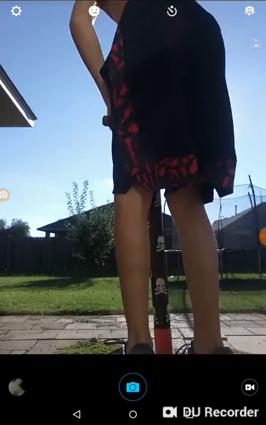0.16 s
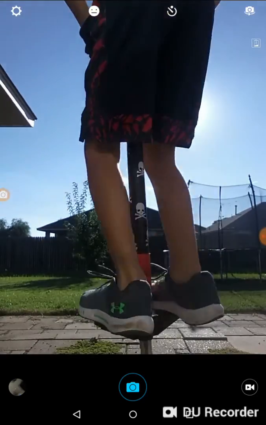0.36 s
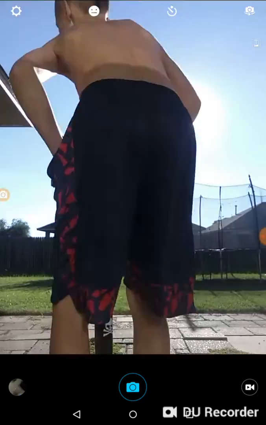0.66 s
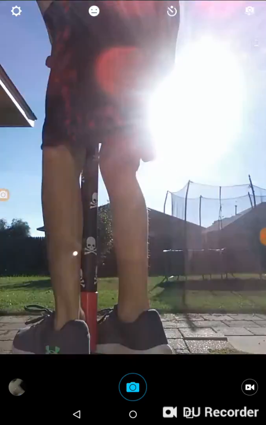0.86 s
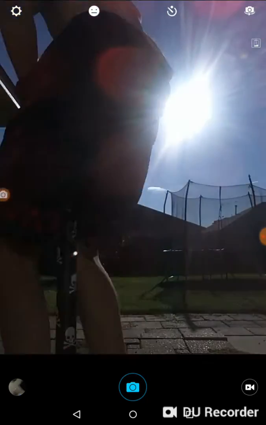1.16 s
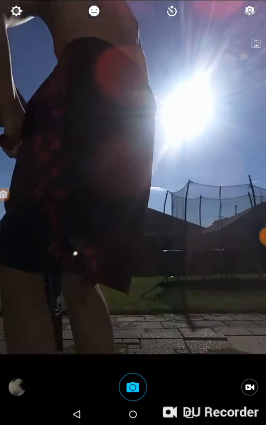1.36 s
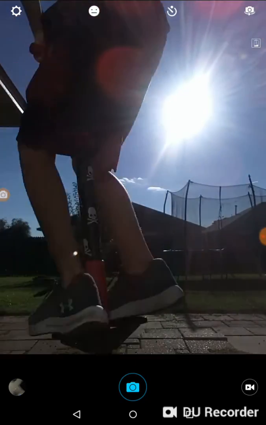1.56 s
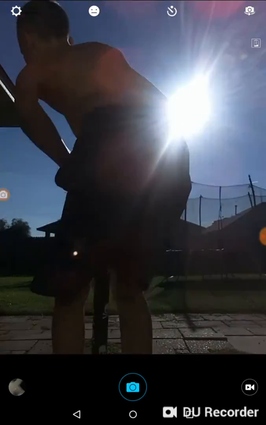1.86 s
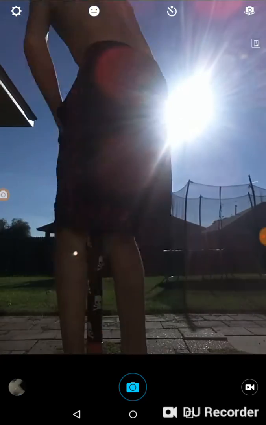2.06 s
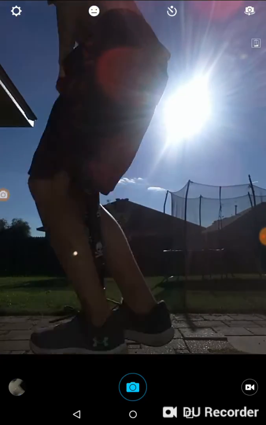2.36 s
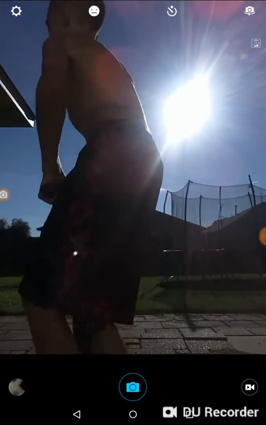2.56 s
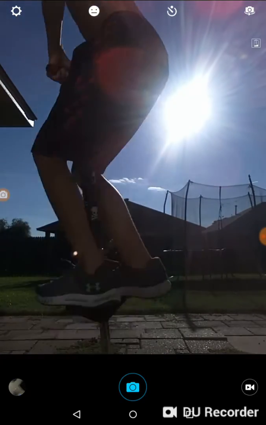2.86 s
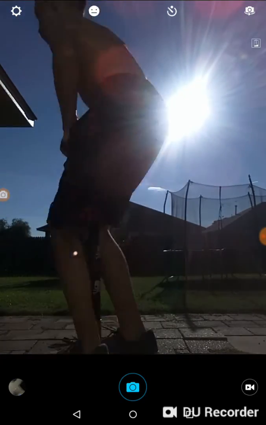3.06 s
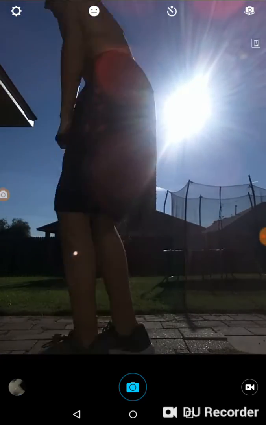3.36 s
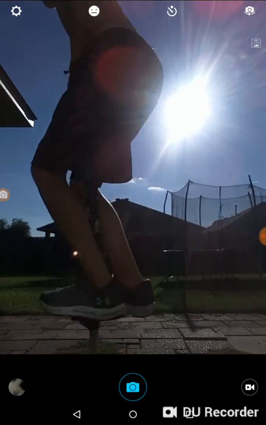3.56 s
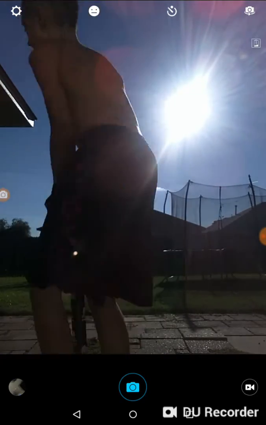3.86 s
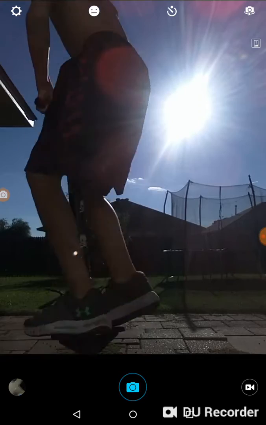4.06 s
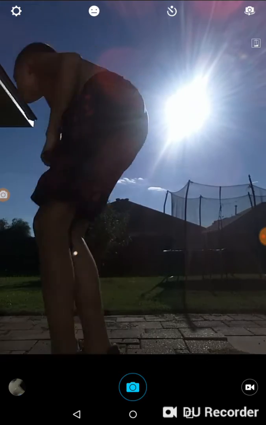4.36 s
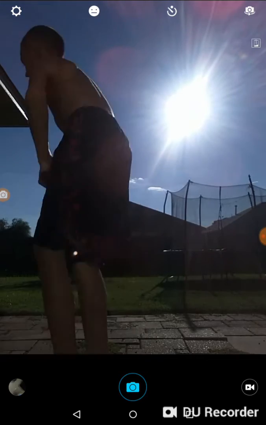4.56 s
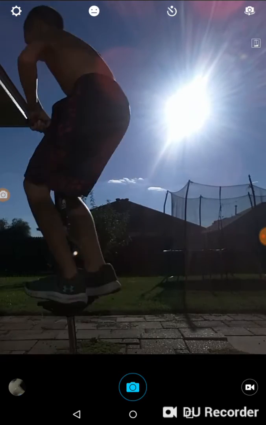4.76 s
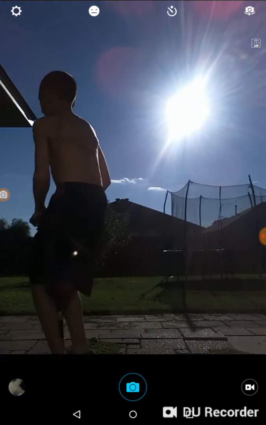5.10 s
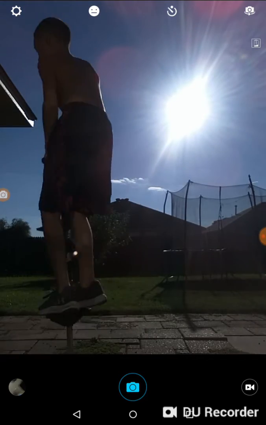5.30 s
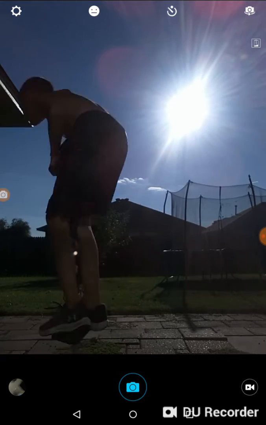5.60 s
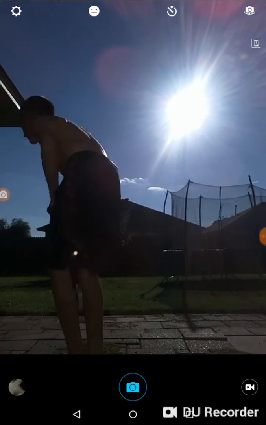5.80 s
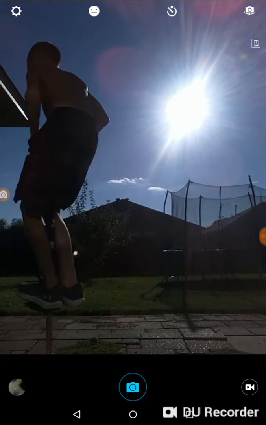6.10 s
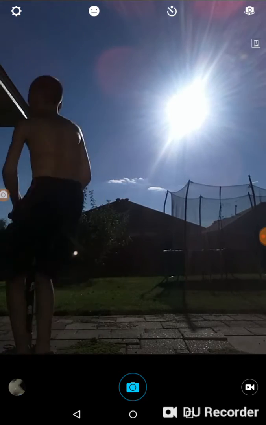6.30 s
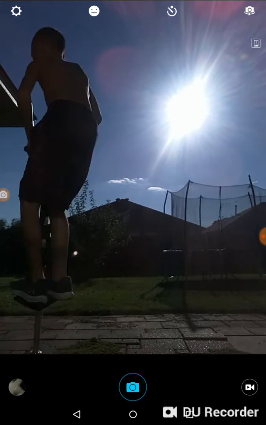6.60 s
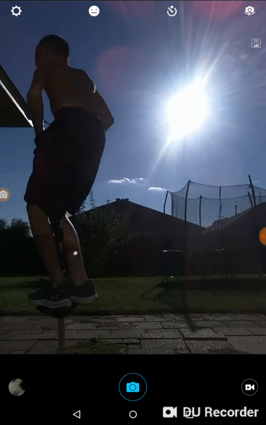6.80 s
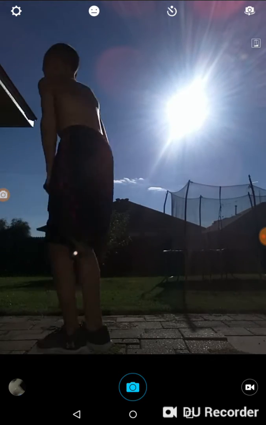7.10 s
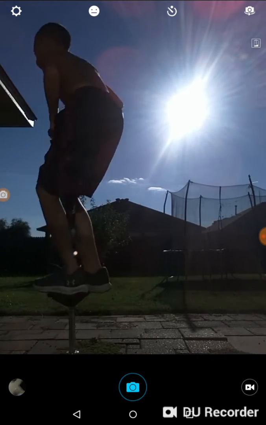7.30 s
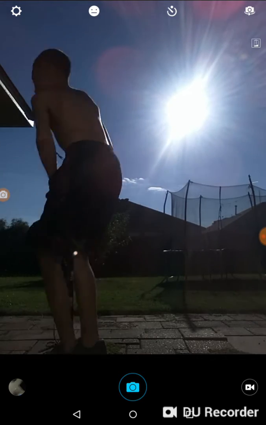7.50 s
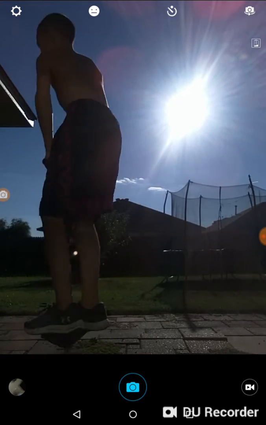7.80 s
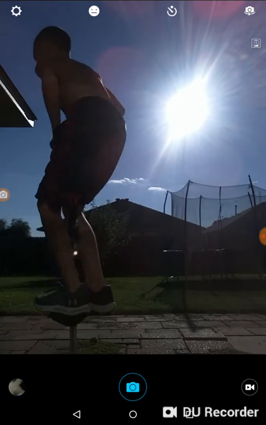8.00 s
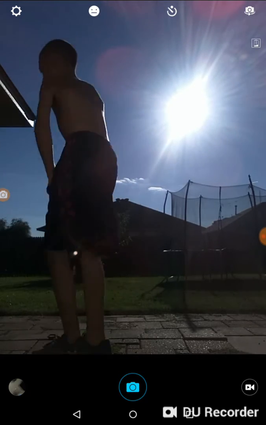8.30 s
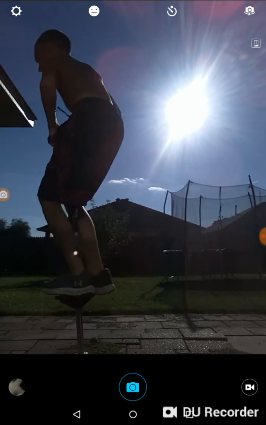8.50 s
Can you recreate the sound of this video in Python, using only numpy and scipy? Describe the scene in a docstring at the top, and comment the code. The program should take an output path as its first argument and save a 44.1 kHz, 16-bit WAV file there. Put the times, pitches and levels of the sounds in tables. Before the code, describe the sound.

A steel pogo stick bounces close by on a paved patio for about 8.5 seconds. It starts mid-bounce with a faint spring knock at 0 s and a loud, bright metal clack at 0.15 s. The first landing comes at 0.5 s: a short low thud, steel clash and rattling coils, followed within a tenth of a second by a hollow knock, then a faint scraping slide and another sharp clack at 0.8 s. This cycle repeats roughly every 0.64 s, with landings near 1.2, 1.8, 2.5, 3.1 and onward to 8.1 s, and a last clack near 8.36 s. Knocks vary from dull bumps to harder clanks, stronger around 1.9, 3.2 and 5.1 s; later landings clash slightly less. Tiny loose-metal ticks appear between blows, notably near 5.4 s. Short, bright reflections and a thin fence echo trail each blow above faint outdoor air and wavering low hum.

```python
"""A child bounces on a steel pogo stick on a garden patio, over a faint outdoor hum made of filtered noise.
First the loaded spring knocks in its tube; then the shaft slides out and clacks against its stop.
Loose parts tick, mostly in mid-air, and each landing thuds and sets the coils rattling before the next knock.
Thuds are fading sine waves; the steel is short clicks sent through fading noise and resonances.
House and fence throw the sound back as a fading tail and one thin echo."""
import sys
import numpy as np
from scipy import signal
from scipy.fft import rfft, irfft
from scipy.io import wavfile

SR = 44100
rng = np.random.default_rng(int(sys.argv[2]) if len(sys.argv) > 2 else 0)


def persist_wave(psi):
    """Save psi, clipped to +-1, as 16-bit WAV."""
    counts = np.round(np.clip(psi, -1, 1) * 32767).astype(np.int16)
    wavfile.write(sys.argv[1], SR, np.atleast_2d(counts).T)


N = 381465  # length of the sound, in samples

# the rubber foot meets the paving: start_s, thud_db, clash_db
LANDING_BLOWS = [(0.5244, -20, -14.5), (1.166, -23.5, -15.5), (1.81, -22, -15.5), (2.4568, -21, -14),
                 (3.0993, -28.5, -15.5), (3.7258, -19.5, -16), (4.3793, -21.5, -14), (4.995, -21.5, -19.5),
                 (5.6466, -19, -17.5), (6.248, -23, -17), (6.8764, -22, -17.5), (7.4921, -18.5, -19.5),
                 (8.095, -19, -20)]
# the compressed spring knocks in the tube: start_s, thud_db, clash_db
SPRING_KNOCKS = [(0, -33.5, -36.5), (0.6099, -21, -28.5), (1.2629, -26.5, -35), (1.9081, -25.5, -19.5),
                 (2.544, -29, -42.5), (3.1803, -24, -20), (3.82, -33.5, -54.5), (4.4612, -25.5, -34),
                 (5.072, -25, -19.5), (5.7304, -25.5, -32), (6.344, -25, -27.5), (6.9654, -23.5, -22),
                 (7.579, -28, -40.5), (8.184, -21.5, -21.5)]
# the shaft slides out and hits its stop: stop_s, clash_db, slide_db
STOP_BLOWS = [(0.148, -12, -40.5), (0.794, -12.5, -37), (1.447, -13, -40), (2.092, -13.5, -45),
              (2.727, -13, -40), (3.3625, -14, -41), (3.999, -13.5, -42.5), (4.6296, -12.5, -42.5),
              (5.2611, -15, -41), (5.911, -13.5, -48), (6.515, -13.5, -46.5), (7.143, -14.5, -40.5),
              (7.751, -13.9, -43), (8.355, -15, -46.5)]
# crowded resonances of tube and spring: pitch_hz, width_hz, level_db
STEEL_RESONANCES = [(780, 130, -0.5), (1286, 81, 6), (1514, 180, 3), (2215, 180, 1), (3620, 1400, -10),
                    (4240, 270, -5.5), (5797, 300, 2), (6484, 110, 3), (7606, 760, 4), (8880, 250, 0)]
# colour of the contacts with the foot on the ground: pitch_hz, level_db_per_hz
LOADED_COLOUR = [(60, -18), (200, 17), (450, 6.5), (750, -7.5), (1000, -1), (2000, 1.5), (2800, -1),
                 (4000, 3.5), (5100, -4), (8000, -8.5), (10000, -6.5), (13000, -18), (16000, -19.5)]
# colour of the contacts with the foot off the ground: pitch_hz, level_db_per_hz
FREE_COLOUR = [(60, -41.5), (200, -21), (400, -4.5), (650, -0.5), (1000, -2), (2000, 1.5), (2800, -2),
               (4000, 5.5), (5100, -0.5), (8000, -2.5), (10000, 3), (13000, -8), (16000, -10.5)]

BLOW_S = .02  # a blow's level is its energy spread over this time
TIME = np.arange(int(.6 * SR)) / SR  # seconds since a blow


def from_db(db):
    """Turn decibels into a factor for the wave's height."""
    return 10 ** (np.asarray(db) / 20)


def unit(x):
    """Scale to energy 1."""
    return x / np.sqrt(np.sum(x ** 2) + 1e-20)


def at_hz(points, hz):
    """Read a table between its points, with pitch on a logarithmic axis as in hearing."""
    table_hz, values = np.array(points).T
    return np.interp(np.log(np.maximum(hz, 1)), np.log(table_hz), values)


def butter(order, hz, kind="low"):
    """Design a smooth filter that passes one range of pitches."""
    return signal.butter(order, hz, kind, fs=SR, output="sos")


def add(track, s, level_db, sound):
    """Lay a blow into the track."""
    at = max(round(s * SR), 0)
    part = sound[:max(N - at, 0)]
    track[at:at + len(part)] += from_db(level_db) * np.sqrt(BLOW_S * SR) * part


def through(x, response):
    """Let every sample of x set off the response, and add up the results."""
    return signal.fftconvolve(x, response)[:len(x)]


def resonate(x, hz, width_hz):
    """Let one resonance answer x; a narrow one rings longer."""
    return signal.lfilter(*signal.iirpeak(hz, hz / width_hz, fs=SR), x)


def colour(x, spectrum, size=4096):
    """Filter to the given spectrum without sounding early (minimum phase); white noise keeps its power."""
    log_height = np.log(from_db(at_hz(spectrum, np.fft.rfftfreq(size, 1 / SR))))
    cepstrum = irfft(log_height)
    # folding the cepstrum onto positive times puts the response's energy at its start
    folded = np.r_[0, 2 * cepstrum[1:size // 2]]
    response = irfft(np.exp(rfft(folded, size)))
    return through(x, unit(response))


def brighten(x, times, bright_db, pivot_hz=3300):
    """Each blow tips the balance of bass and treble by its own amount until the next one comes."""
    # the tip changes 3 ms ahead of the blow
    latest = np.maximum(np.searchsorted(times, np.arange(N) / SR + .003) - 1, 0)
    tip = from_db(bright_db)[latest]
    low = signal.sosfilt(butter(1, pivot_hz), x + 1e-18)
    return (low / tip + (x - low) * tip) / np.sqrt((tip ** 2 + tip ** -2) / 2)


def modes(table, scatter_db, detune):
    """Decaying sines; each blow shares its energy among them a little differently."""
    hz, db, t60 = np.array(table).T[:, :, None]
    strength, pitch, side = rng.standard_normal((3, len(table), 1))
    sines = np.sign(side) * np.sin(2 * np.pi * hz * (1 + detune * pitch) * TIME)
    fading = from_db(db + scatter_db * strength - 60 * TIME / t60)
    return unit(np.sum(fading * sines, axis=0))


def chatter(envelope, per_s, spread_db=-0.5):
    """Uneven metal-on-metal contacts at chance moments, under an envelope."""
    touch = rng.random(len(TIME)) < per_s / SR
    signs = rng.choice([-1, 1], len(TIME))
    sizes = signs * from_db(spread_db * rng.standard_normal(len(TIME)))
    return unit(touch * sizes * envelope)


def bands(t60s, count=18):
    """Band filters, each with its own noise and decay time."""
    edges = np.geomspace(50, 18000, count + 1)  # Hz
    white = rng.standard_normal((2, N))
    for k, (low, high) in enumerate(zip(edges, edges[1:])):
        band = butter(2, [low, high], "band")
        noise = signal.sosfilt(band, white[k % 2])
        yield band, noise, at_hz(t60s, np.sqrt(low * high))


def stored(x, t60):
    """Amplitude of the energy that x has fed in and that falls by 60 dB in t60 seconds."""
    keep = from_db(-60 / (t60 * SR)) ** 2
    return np.sqrt(signal.lfilter([1 - keep], [1, -keep], x ** 2 + 1e-18))


def dense_ring(contacts, t60s):
    """Crowded modes die band by band; the spring keeps changing length, so they never ring twice alike."""
    return sum(noise * stored(contacts, t60) for _, noise, t60 in bands(t60s))


def wander(count=130):
    """Slow chance, changing over this many points spread across the whole sound."""
    return np.interp(np.arange(N), np.linspace(0, N, count), rng.standard_normal(count))


def steel(contacts, spectrum, ring_scale, crack_db, tone_db):
    """Contacts give a crack, a dense ring and a few tones; a small ring_scale makes the ringing shorter."""
    # dying away of the steel, before ring_scale: pitch_hz, fall_by_60_db_s
    steel_fading = [(200, 0.25), (1500, 0.03), (4000, 0.16), (8000, 0.022), (15000, 0.062)]
    # single tones that ring on, before ring_scale: pitch_hz, level_db, fall_by_60_db_s
    ringing_tones = [(1450, 31.5, .3), (2164, -14, .32), (3575, -36, .2), (3800, 32.5, .25),
                     (3994, -42, .4), (4240, 62.5, .3), (5728, -55.5, .3), (6444, -32.5, .45),
                     (7090, 30.5, .2), (8877, -64, .25)]
    crack = from_db(crack_db)
    ring = dense_ring(contacts, [(hz, t60 * ring_scale) for hz, t60 in steel_fading])
    body = colour((ring + crack * contacts) / np.hypot(1, crack), spectrum)
    tube = body
    for hz, width_hz, db in STEEL_RESONANCES:
        # the point of contact decides how strongly each resonance answers
        answer = from_db(3 * wander())
        tube = tube + from_db(db) * answer * resonate(body, hz, width_hz)
    scaled_tones = [(hz, db, t60 * ring_scale) for hz, db, t60 in ringing_tones]
    tones = from_db(tone_db) * modes(scaled_tones, scatter_db=0.5, detune=0)
    return unit(tube) * np.linalg.norm(body) + through(contacts, tones)


def clashes(times, levels_db, bounce_db, bounce_s):
    """Each blow is one contact and a quick run of rebounds."""
    track = np.zeros(N)
    for s, level_db in zip(times, levels_db):
        contacts = from_db(bounce_db) * chatter(np.exp(-TIME / bounce_s), per_s=790)
        contacts[0] += 1
        add(track, s, level_db, unit(contacts))
    return track


def thuds(times, levels_db, tilts_db, rise_s, ring_scale=1):
    """Each blow shakes the frame; a soft push favours its lowest modes (tilt in dB per octave)."""
    # low modes of frame and rider, before tilt and ring_scale: pitch_hz, level_db, fall_by_60_db_s
    frame_modes = [(74.4, -17.5, 0.23), (132, -7.5, 0.14), (158, -12.5, 0.22), (220, -4, 0.1),
                   (257, 2.5, 0.1), (300, -5.5, 0.12), (357, -2, 0.072), (410.6, -7, 0.14),
                   (462, -7.5, 0.058), (516, -2, 0.068), (592, -8.5, 0.16), (708, -2.5, 0.074),
                   (778.5, 3, 0.033)]
    track = np.zeros(N)
    for s, level_db, tilt_db in zip(times, levels_db, tilts_db):
        table = [(hz, db + tilt_db * np.log2(hz), t60 * ring_scale) for hz, db, t60 in frame_modes]
        rise = 1 - np.exp(-TIME / rise_s)
        add(track, s, level_db, unit(modes(table, scatter_db=2.5, detune=0.028) * rise))
    return track


def each_bounce(blows, delay_s, level_db):
    """One small contact beside every blow, varying in time and level: rows of start_s, level_db."""
    jitter_s, spread_db = .002, 5
    chance = rng.standard_normal((len(blows), 2))
    return [(blow[0] + delay_s + jitter_s * late, level_db + spread_db * loud)
            for blow, (late, loud) in zip(blows, chance)]


def background(air_db=-59.5, hum_db=-59, hum_hz=68.7, hum_half_width_hz=8.8):
    """Quiet outdoor air and the wavering hum of a distant machine, both filtered noise."""
    # colour of the outdoor air: pitch_hz, level_db_per_hz
    air_colour = [(18, -32), (30, -15.5), (121, -6), (170, -16.5), (374, -21), (801, -40), (1760, -35),
                  (2350, -21.5), (2750, -42), (4080, -29), (5040, -37), (9220, -33.5), (16000, -48.5)]
    air = unit(colour(rng.standard_normal(N), air_colour))
    band = butter(2, [hum_hz - hum_half_width_hz, hum_hz + hum_half_width_hz], "band")
    # drop the first second, while the narrow filter settles
    hum = unit(signal.sosfilt(band, rng.standard_normal(N + SR))[SR:])
    return np.sqrt(N) * (from_db(air_db) * air + from_db(hum_db) * hum)


def scatter(x, colour_db=-3):
    """Reflections from paving and house wall, ever new as the stick hops; they keep the steel's resonances."""
    # dying away of the patio: pitch_hz, fall_by_60_db_s
    patio_fading = [(100, 0.35), (300, 0.65), (700, 0.4), (1500, 0.33), (4000, 0.35), (8000, 0.26),
                    (11000, 0.31), (15000, 0.3)]
    tail = sum(noise / np.std(noise) * stored(signal.sosfilt(band, x), t60)
               for band, noise, t60 in bands(patio_fading))
    ringing = sum(from_db(db + colour_db) * resonate(tail, hz, width_hz)
                  for hz, width_hz, db in STEEL_RESONANCES)
    return unit(tail + ringing) * np.linalg.norm(tail)


def patio(x, wet_db=-7, thin_hz=380, dull_hz=10500, echo_s=0.082, echo_db=-24):
    """The open patio returns little bass or top treble; the fence gives one thin, blurred echo."""
    wet = signal.sosfilt(butter(1, thin_hz, "high"), scatter(x))
    wet = signal.sosfilt(butter(2, dull_hz), wet)
    blur = rng.standard_normal(len(TIME)) * np.exp(-np.abs(TIME - echo_s) / .004)
    echo = unit(signal.sosfilt(butter(2, [700, 6000], "band"), blur))
    return x + from_db(wet_db) * wet + from_db(echo_db) * through(x, echo)


def ticks(turn_bright_db=9, loose_bright_db=-4.0):
    """Play in shaft and foot pegs clicks thinly at the turn of every stroke, and now and then in between."""
    # loose parts tick, mostly in mid-air: start_s, level_db
    loose_ticks = [(0.037, -33.5), (0.321, -40.5), (1.554, -33), (1.608, -34), (1.71, -44.5), (2.65, -39.5),
                   (2.896, -41.5), (2.995, -49.5), (4.335, -34), (4.895, -46), (5.435, -32.5),
                   (5.4444, -29.5), (5.568, -48.5), (6.08, -39.5), (6.485, -33.5)]
    turn_clicks = each_bounce(LANDING_BLOWS, delay_s=0.16, level_db=-53.5)
    turns = [(s, db, turn_bright_db) for s, db in turn_clicks]
    loose = [(s, db, loose_bright_db) for s, db in loose_ticks]
    s, level_db, bright_db = np.transpose(sorted(turns + loose))
    contacts = clashes(s, level_db, bounce_db=-12.5, bounce_s=0.0029)
    metal = steel(contacts, FREE_COLOUR, ring_scale=1.0, crack_db=-6, tone_db=-19.5)
    return brighten(metal, s, bright_db)


def clunks(low_hz=450, high_hz=1800, ring_s=0.006):
    """The spring's flank bumps the tube with a hollow sound, at each knock and again as it unloads."""
    # -6.5 dB sets the hollow clunk against the knock's thud
    bumps = [(s, thud_db - 6.5) for s, thud_db, _ in SPRING_KNOCKS]
    # the spring unloads shortly before the shaft hits its stop
    bumps += each_bounce(STOP_BLOWS, delay_s=-.031, level_db=-43.5)
    hollow = butter(3, [low_hz, high_hz], "band")
    track = np.zeros(N)
    for s, level_db in bumps:
        burst = rng.standard_normal(len(TIME)) * np.exp(-TIME / ring_s)
        add(track, s, level_db, unit(signal.sosfilt(hollow, burst)))
    return track


def slides(lead_s=.093, peak_share=0.57, spread=0.95):
    """The shaft sticks and slips through its bushing on the way out, starting lead_s before its stop."""
    # colour of the rubbing: pitch_hz, level_db_per_hz
    sliding_colour = [(100, -19.5), (400, 0), (900, -8.5), (1400, 3.5), (2500, -1.5), (4000, 3.5),
                      (7000, -7.5), (10000, -4.5), (13000, -19), (16000, -21.5)]
    track = np.zeros(N)
    # a broad swell; its peak and width are shares of lead_s
    speed = np.exp(-np.abs((TIME / lead_s - peak_share) / spread) ** 3)
    for stop_s, _, slide_db in STOP_BLOWS:
        slips = chatter(speed, per_s=260, spread_db=-3.5)
        add(track, stop_s - lead_s, slide_db, np.sqrt(lead_s / BLOW_S) * slips)
    return steel(track, sliding_colour, ring_scale=0.84, crack_db=-4, tone_db=-20.5)


def knocks(usual_db=-23.0, bright_db=1.3, bright_per_db=-0.1, hardness_db=-3.5, hardness_per_db=0.3):
    """Near the bottom the bowed spring knocks on the tube; a light touch bumps dully, a hard one clanks."""
    s, thud_db, clash_db = np.transpose(SPRING_KNOCKS)
    force_db = clash_db - usual_db
    contacts = clashes(s + 0.0012, clash_db, bounce_db=8, bounce_s=0.0066)
    metal = steel(contacts, LOADED_COLOUR, ring_scale=0.093, crack_db=-10.0, tone_db=-30)
    metal = brighten(metal, s, bright_db + bright_per_db * force_db)
    tilts_db = hardness_db + hardness_per_db * force_db
    return metal + thuds(s, thud_db, tilts_db, rise_s=0.00093, ring_scale=0.94)


def top_outs(bright_db=-1.3, hardness_db=1.3, thud_db=-41.5):
    """The shaft hits its stop as the stick leaves the ground; the steel rings freely, the frame barely shakes."""
    s, clash_db, _ = np.transpose(STOP_BLOWS)
    each = np.ones(len(s))
    contacts = clashes(s, clash_db, bounce_db=6.5, bounce_s=0.013)
    metal = steel(contacts, FREE_COLOUR, ring_scale=0.99, crack_db=-17, tone_db=-24.0)
    metal = brighten(metal, s, bright_db * each)
    return metal + thuds(s, thud_db * each, hardness_db * each, rise_s=0.0017)


def landings(usual_db=-15.5, bright_db=3.5, bright_per_db=0.46, hardness_db=2.0):
    """The foot thuds, the stick clashes and the coils rattle on the tube; harder landings are brighter."""
    rattle_at_s, rattle_db = .021, -1  # delay of the rattle's peak; its level against the clash
    s, thud_db, clash_db = np.transpose(LANDING_BLOWS)
    contacts = clashes(s, clash_db, bounce_db=7, bounce_s=0.0067)
    rattling = np.exp(-((TIME - rattle_at_s) / .017) ** 4)
    for at, level_db in zip(s, clash_db):
        add(contacts, at, level_db + rattle_db, chatter(rattling, per_s=450))
    metal = steel(contacts, LOADED_COLOUR, ring_scale=0.5, crack_db=-13, tone_db=-18.0)
    metal = brighten(metal, s, bright_db + bright_per_db * (clash_db - usual_db))
    # the thud begins 1 ms ahead of the clash
    return metal + thuds(s - .001, thud_db, np.full(len(s), hardness_db), rise_s=0.0011)


def scene():
    """Stick and patio over the outdoor background."""
    stick = ticks() + clunks() + slides() + knocks() + top_outs() + landings()
    return (background() + patio(stick))[None]


def record(dry):
    """The loudest peaks are rounded and the treble above 16 kHz is cut."""
    ceiling = .66
    rounded = ceiling * np.tanh(dry / ceiling)
    return signal.sosfilt(signal.ellip(10, .2, 70, 16000, fs=SR, output="sos"), rounded)


dry = scene()
out = record(dry)
persist_wave(out)
```